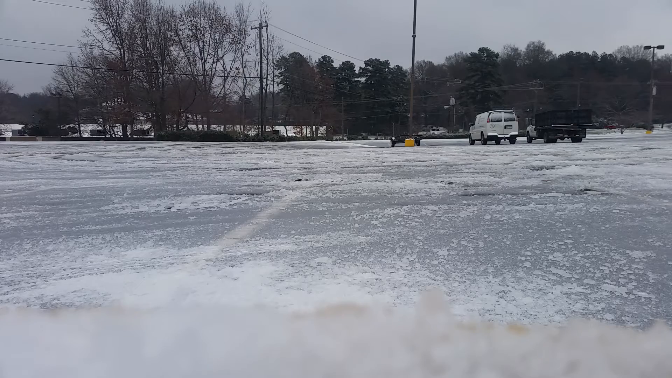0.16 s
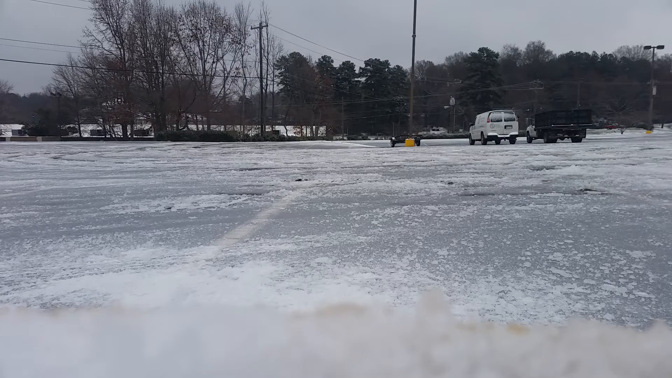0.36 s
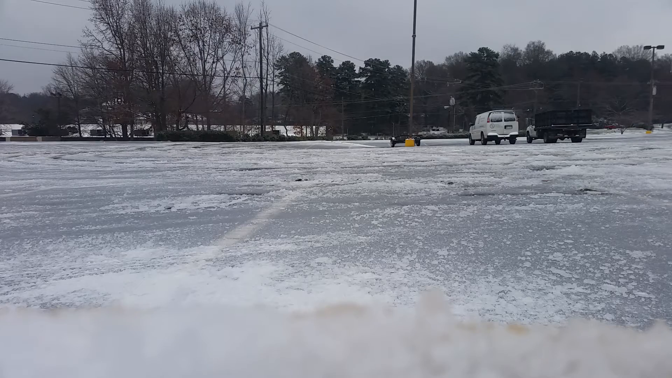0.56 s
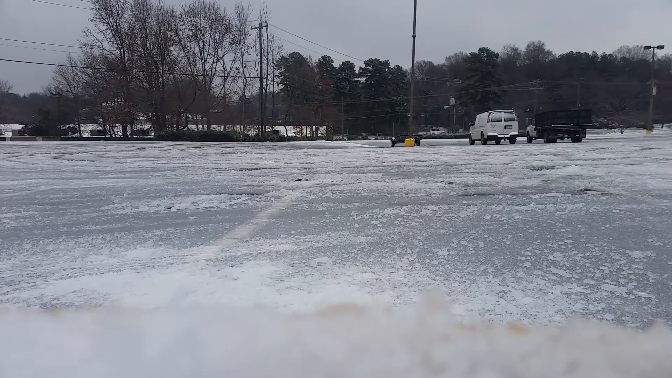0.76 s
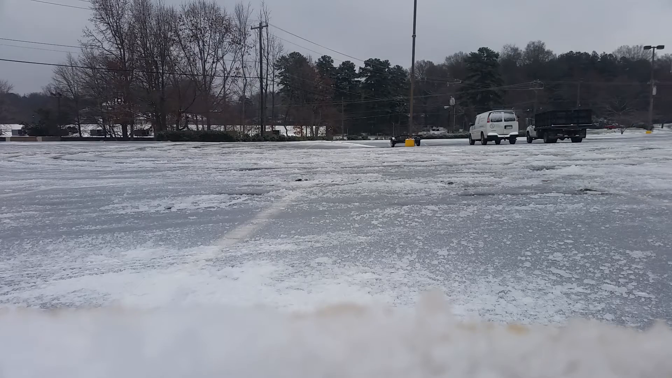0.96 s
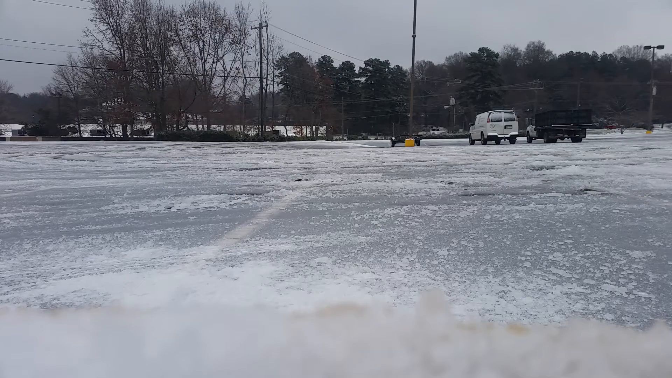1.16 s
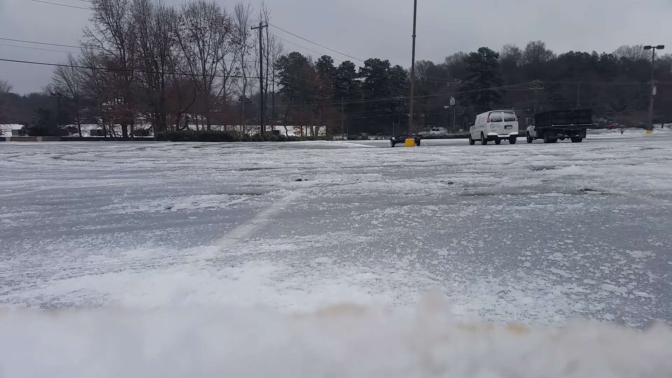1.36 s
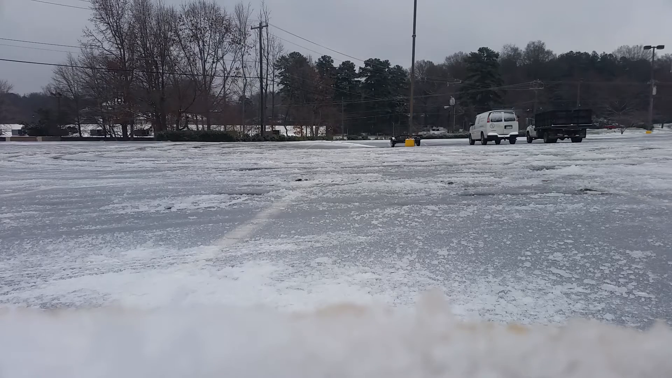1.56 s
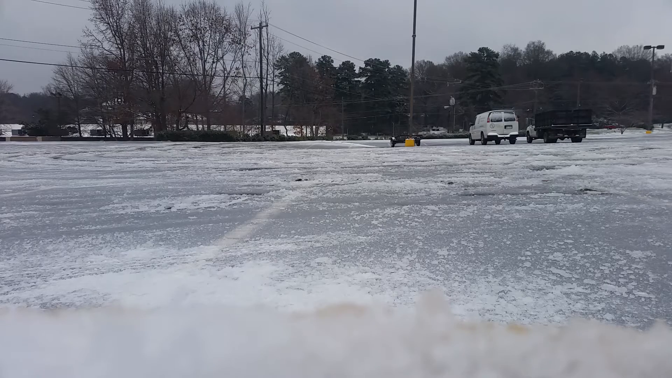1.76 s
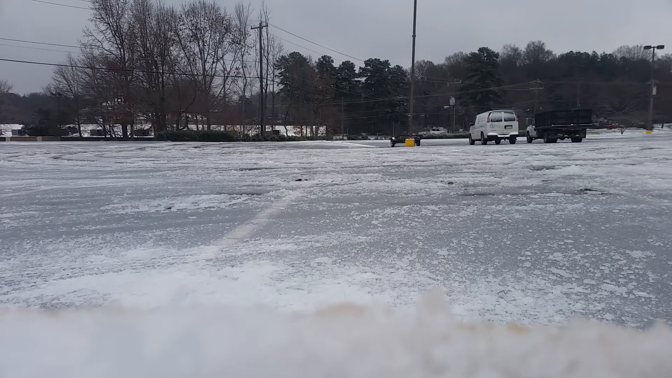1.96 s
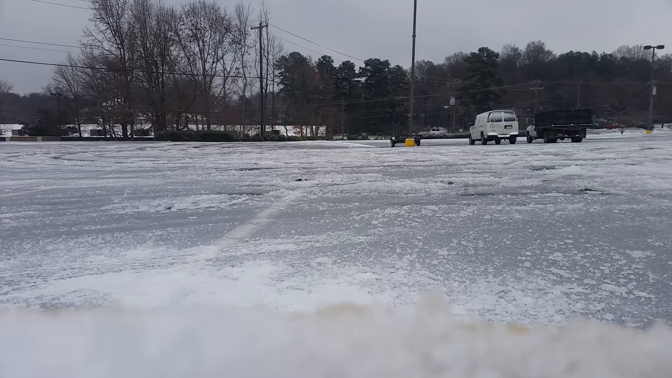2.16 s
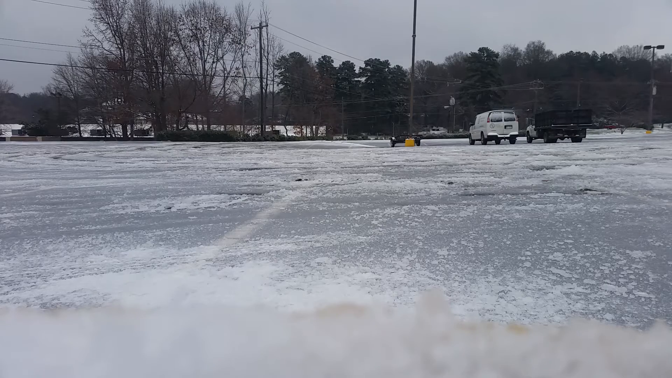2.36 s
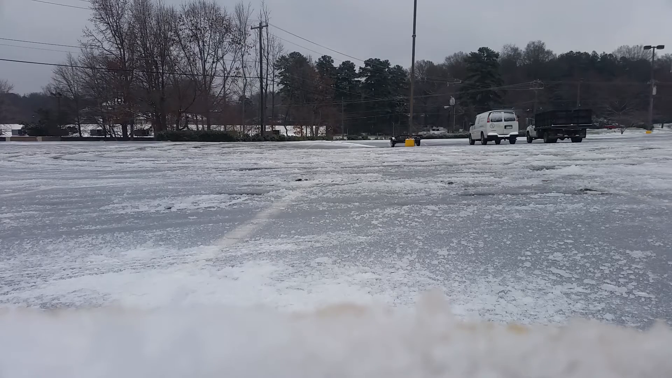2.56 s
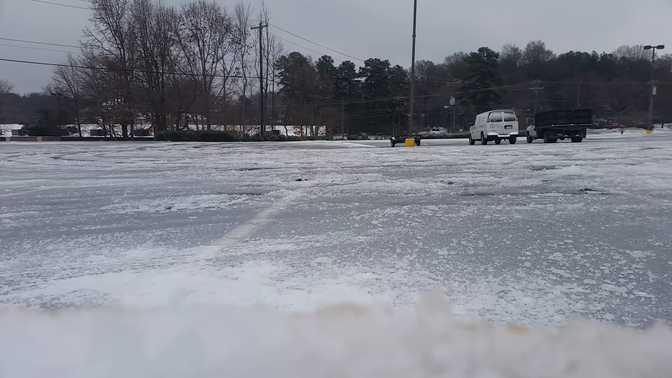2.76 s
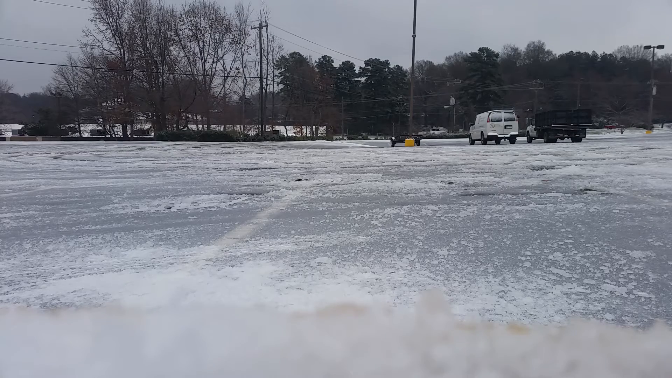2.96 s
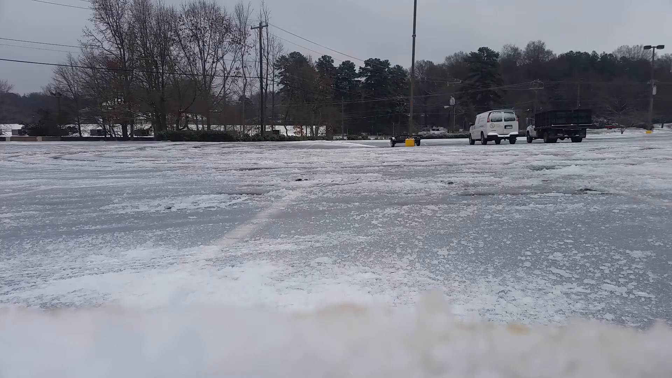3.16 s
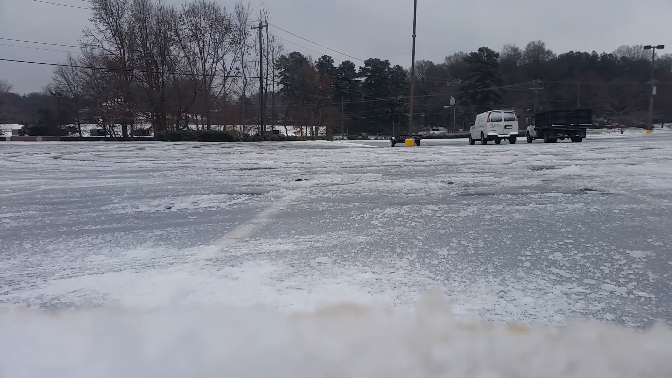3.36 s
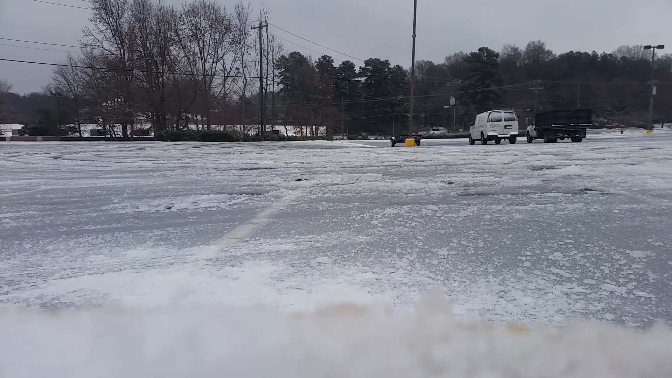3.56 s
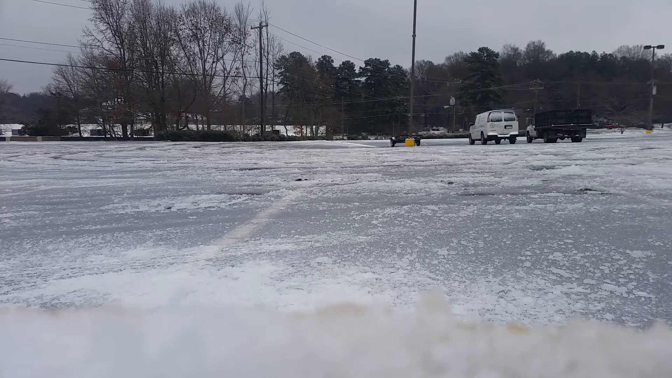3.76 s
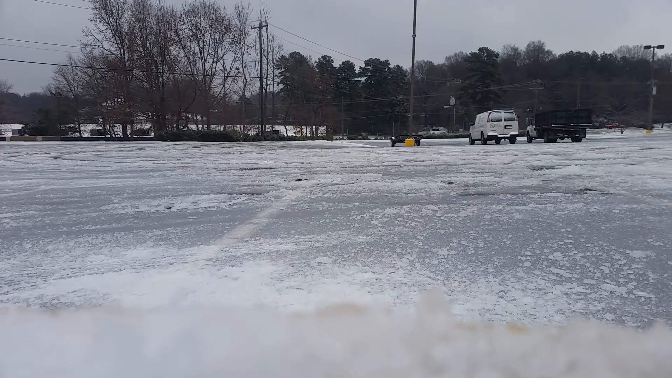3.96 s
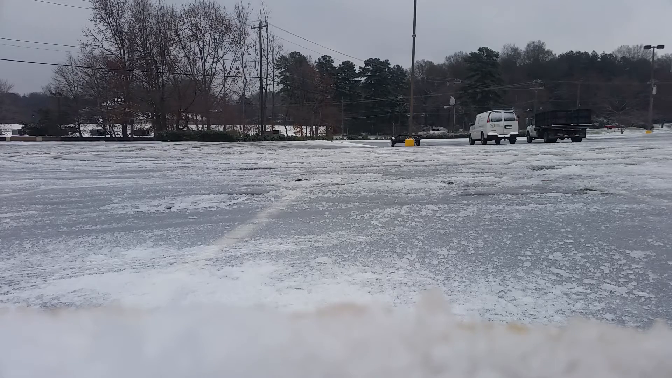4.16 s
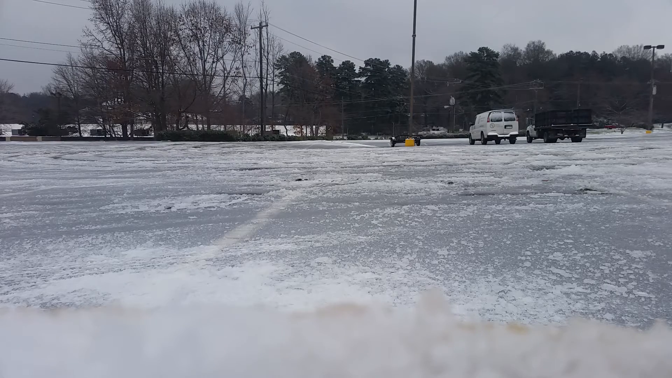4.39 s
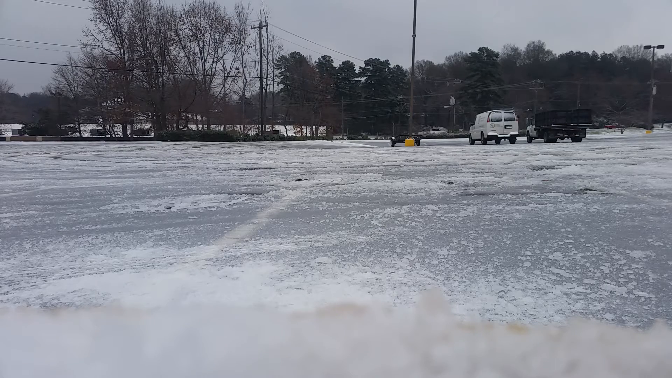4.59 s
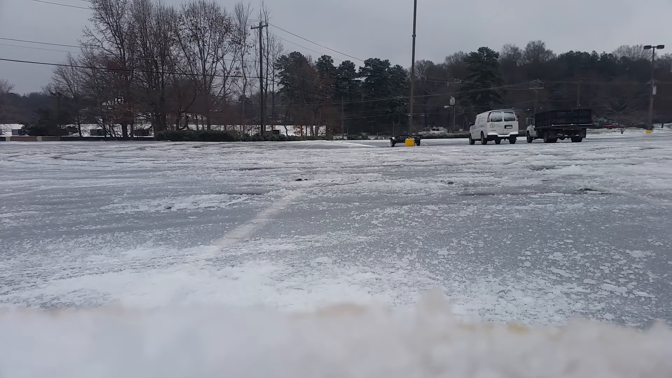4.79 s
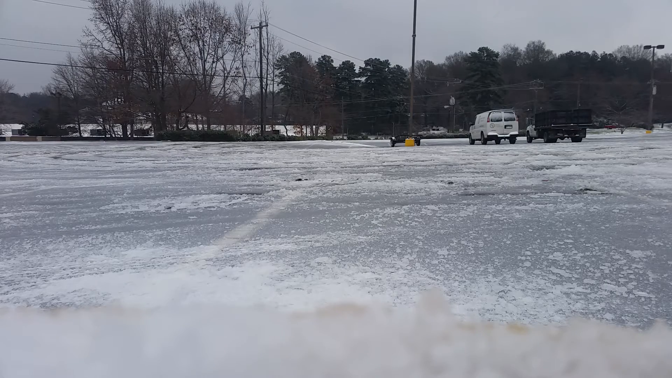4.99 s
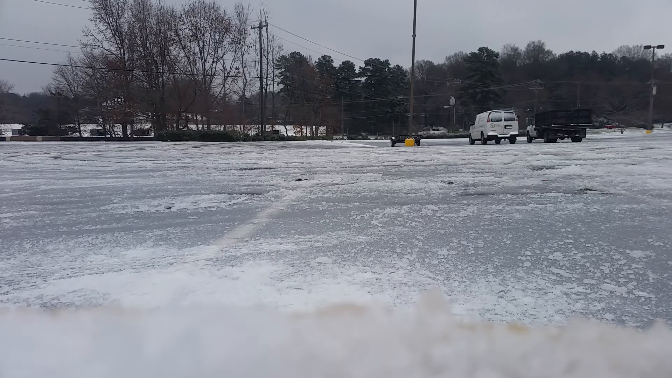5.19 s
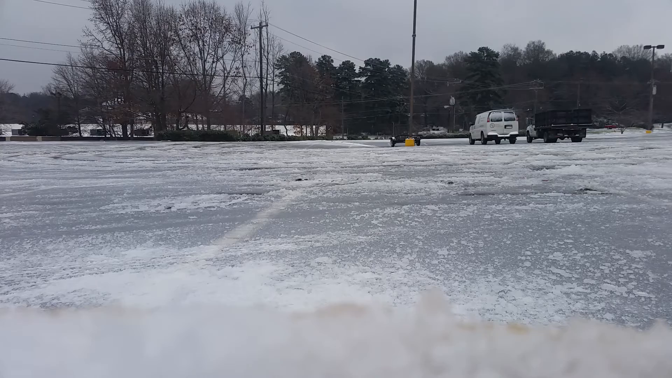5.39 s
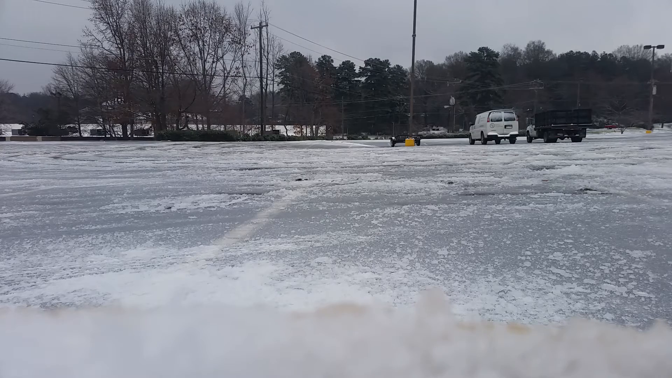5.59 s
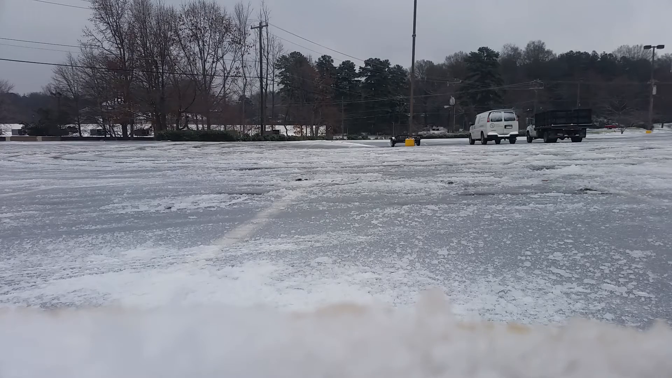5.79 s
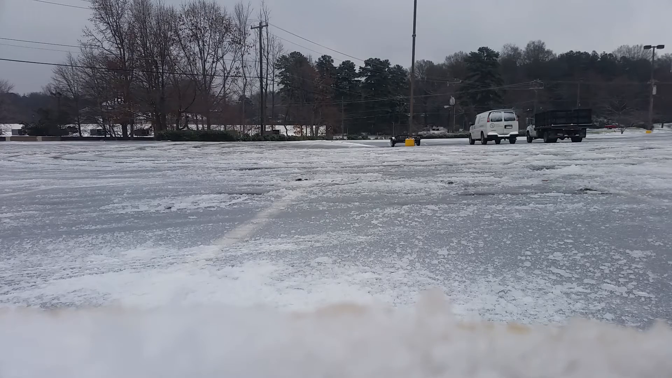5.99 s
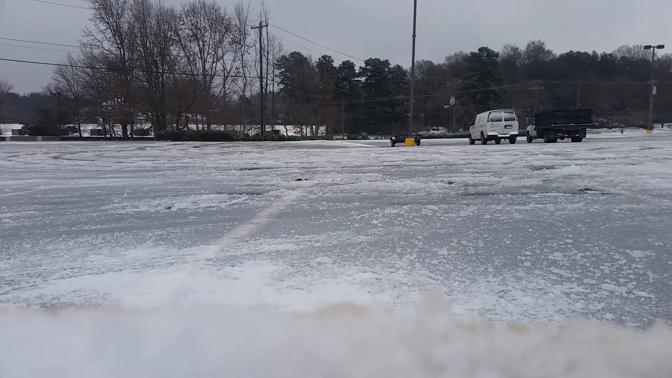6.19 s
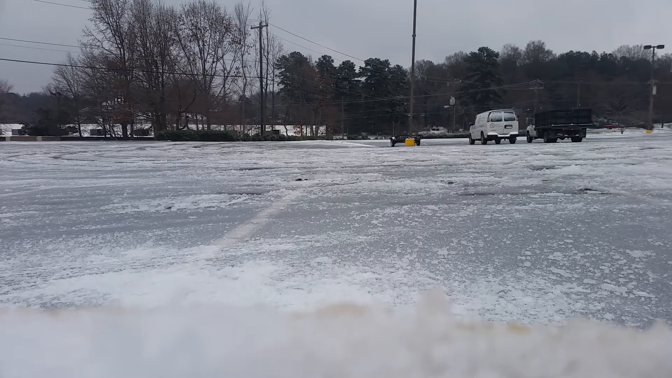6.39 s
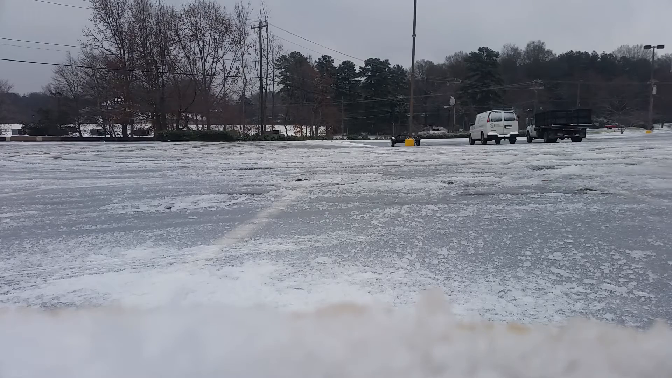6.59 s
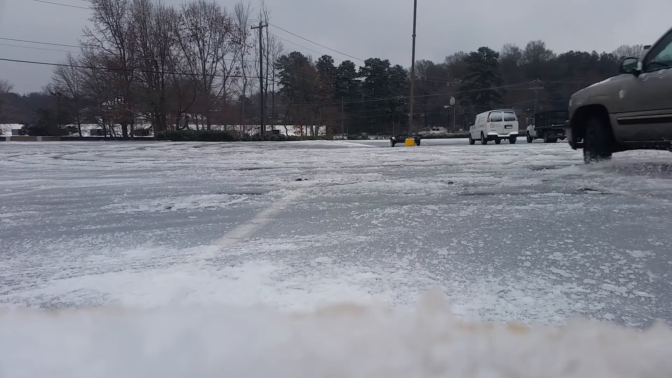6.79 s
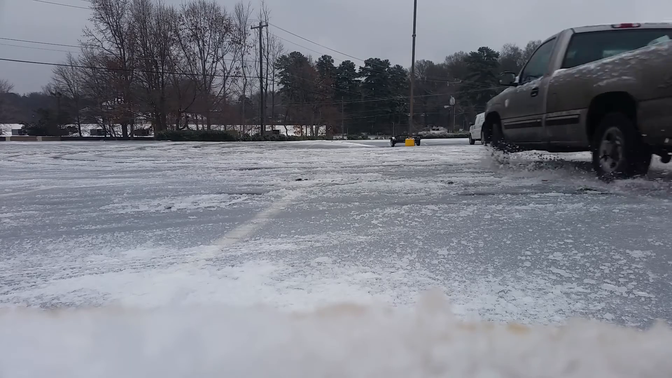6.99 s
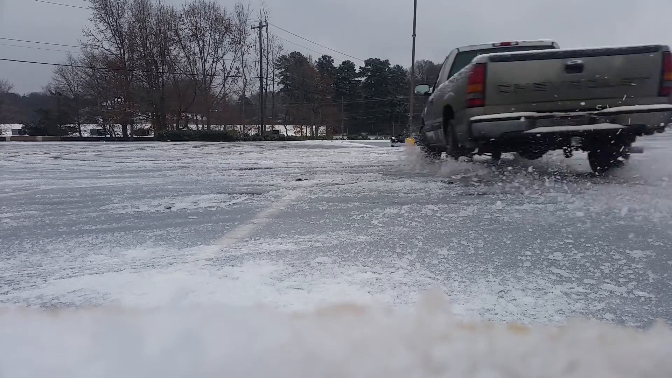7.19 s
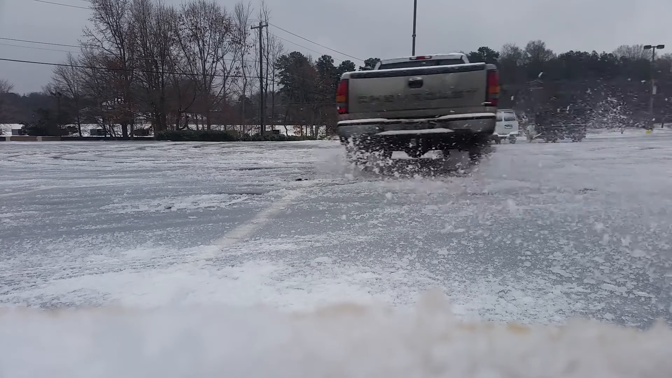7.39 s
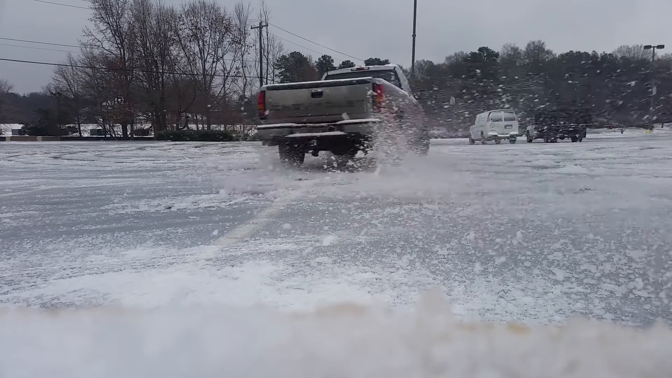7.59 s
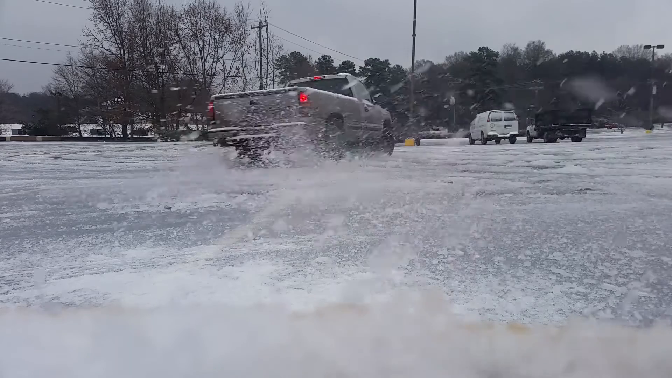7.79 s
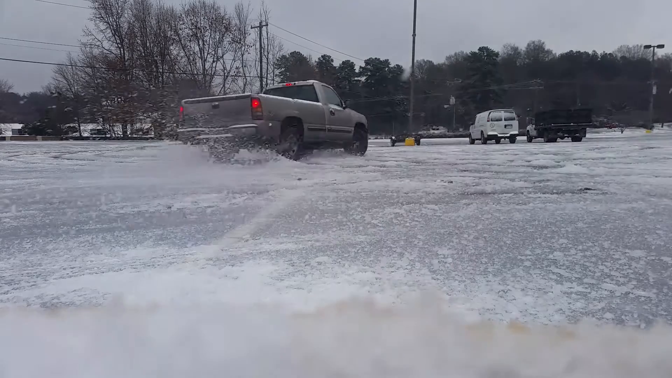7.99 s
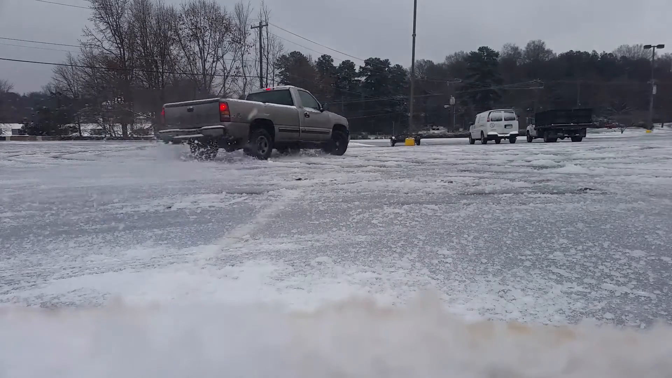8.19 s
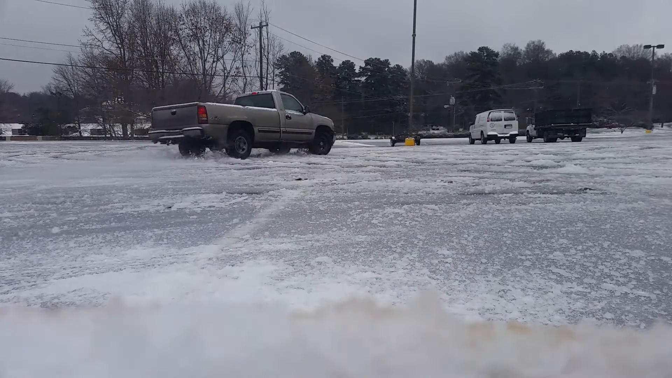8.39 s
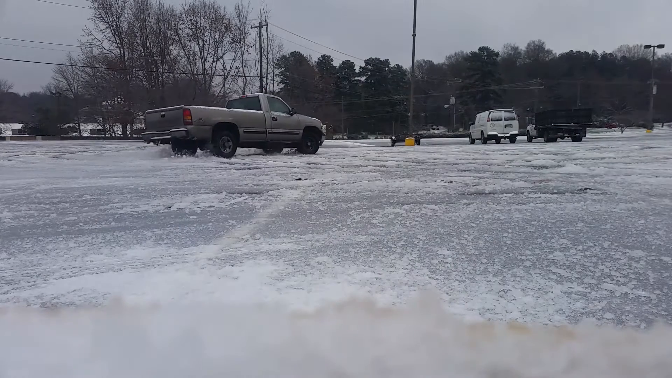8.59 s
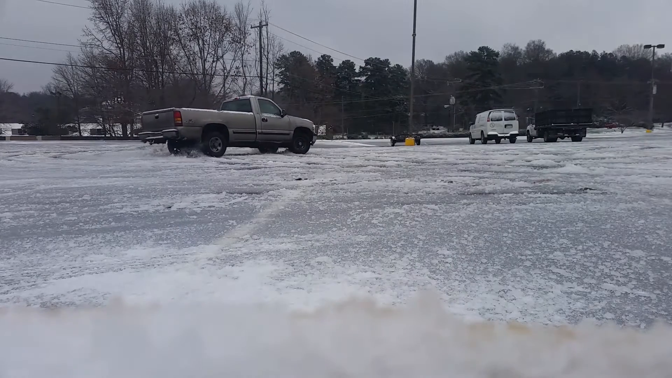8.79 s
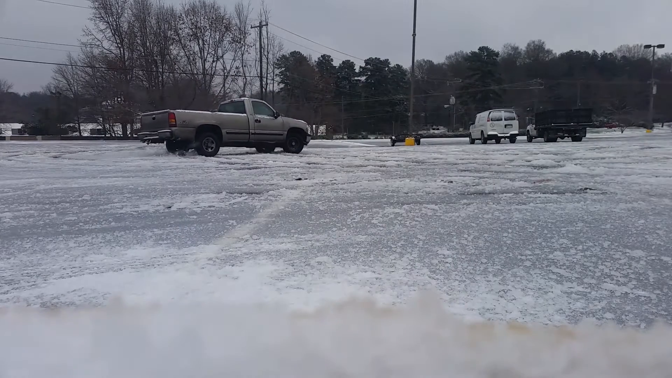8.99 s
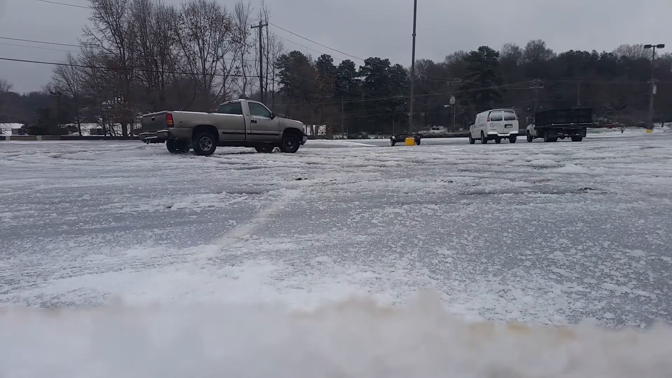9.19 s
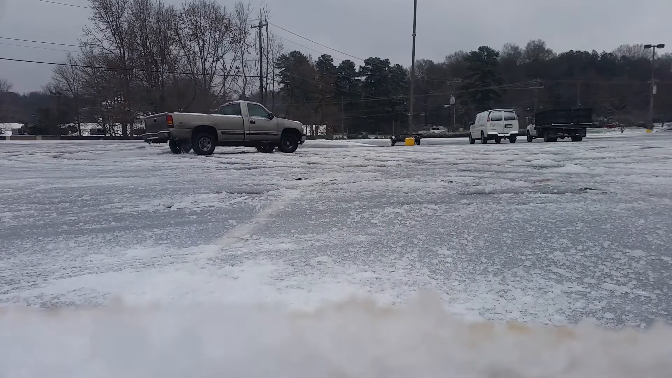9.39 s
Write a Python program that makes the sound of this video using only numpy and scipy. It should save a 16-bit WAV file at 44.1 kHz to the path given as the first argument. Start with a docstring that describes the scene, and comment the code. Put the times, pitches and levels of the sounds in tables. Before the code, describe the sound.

Outdoors on a slushy, icy lot, an eight-cylinder pickup growls and eases off out to the right, with rough tyre roar and crust cracks. It blips again, then revs hard and rushes in, crunching and hissing spray. It slides past close, lumps of slush tick and thud near the stereo camera microphones, then it drops away leftward under low wind buffeting and a hard final gust.

```python
"""Beside an icy, slushy road, two microphone ports on a camera: an eight-cylinder pickup revs, comes in from
the right, slides past and rolls off to the left. Its engine is a sum of cycle harmonics through a pipe resonance.
Its tyres are coloured noises that roar, crunch and throw spray; lumps and crumbs are short noise cracks.
Wind buffets each port with low noise, and low thumps strike single ports. Sound bending round the camera
and off the snow leaves a hollow in each port that follows the truck's bearing."""
import sys
import numpy as np
from scipy import signal
from scipy.fft import rfft, irfft, next_fast_len
from scipy.io import wavfile
from scipy.ndimage import uniform_filter1d, map_coordinates

SR = 44100
rng = np.random.default_rng(int(sys.argv[2]) if len(sys.argv) > 2 else 0)


def dump_mix(stems):
    """Bounce the given channels to the path in sys.argv[1] as a 16-bit WAV at rate SR."""
    frames = np.atleast_2d(stems).T  # one column per channel
    limited = np.clip(frames, -1, 1)  # hard clip at full scale
    pcm = np.round(limited * 32767).astype(np.int16)
    wavfile.write(sys.argv[1], SR, pcm)


N = 416744

# bearings the truck's sound comes from, from straight ahead, right positive:
# t/s, main treble source/degrees, bass source/degrees
BEARINGS = [(0, 105, 105), (4.5, 105, 105), (5.4, 95, 95), (6.4, 82, 82), (6.7, 72, 74), (7.02, 59, 59),
            (7.04, -26, 57), (7.3, -26, 31), (7.55, -26, 13), (7.75, -26, -2), (8, -27, -27),
            (9.45, -30, -30)]


def amp(db):
    """Gain of a level in dB."""
    return 10 ** (np.asarray(db) / 20)


def unit(x):
    """Scaled to rms 1."""
    return x / np.sqrt(np.mean(x ** 2, axis=-1, keepdims=True) + 1e-20)


def along(points, hz):
    """Values at hz from rows of f/Hz, value, joined on a log frequency axis."""
    f, v = np.transpose(points)
    return np.interp(np.log(hz + 1), np.log(f + 1), v)


def curves(rows):
    """One value per sample for each column after the time."""
    s, *cols = np.transpose(rows)
    return [np.interp(np.arange(N) / SR, s, c) for c in cols]


def wobble(rate):
    """A smooth random curve, rate knots a second."""
    knots = rng.standard_normal(int(N * rate / SR) + 4)
    return map_coordinates(knots, [np.arange(N) * rate / SR])


def filtered(x, response):
    """x times a response of frequency."""
    m = next_fast_len(N + 8192)
    return irfft(rfft(x, m) * response(np.fft.rfftfreq(m, 1 / SR)), m)[..., :N]


def gritty(spectrum, patchy_db, grain_db, channels):
    """Coloured noise of rms 1 with patches of gain and grains of very unequal size."""
    grit = rng.standard_normal((channels, N)) * amp(grain_db * wobble(300))
    z = signal.stft(grit, nperseg=512)[2]
    # one field of patches in frequency and time serves every channel
    field = rng.standard_normal(z.shape[1:])
    field = uniform_filter1d(uniform_filter1d(field, size=7, axis=0), size=10, axis=1)
    patchy = z * amp(patchy_db * field / field.std())
    x = signal.istft(patchy, nperseg=512)[1][:, :N]
    return unit(filtered(x, lambda hz: amp(along(spectrum, hz))))


def held(start, end, rise, fall):
    """An envelope: rise, hold at 1 from start to end, fall."""
    return np.interp(np.arange(N) / SR, [start - rise, start, end, end + fall], [0, 1, 1, 0])


def bump(s, length):
    """Start sample and bell-shaped envelope centred on s, length seconds wide at half height."""
    shape = np.hanning(int(2 * length * SR))
    return max(round(s * SR) - len(shape) // 2, 0), shape


def hollow(hz, dip_hz, rise, dip_width, peak_width):
    """A dip with a resonance above it by the factor rise; widths are fractions of dip_hz."""
    dip = dip_hz ** 2 - hz ** 2 + 1j * hz * dip_width * dip_hz
    peak = (rise * dip_hz) ** 2 - hz ** 2 + 1j * hz * peak_width * dip_hz
    return dip / peak


def shade(degrees):
    """What the camera's body does to the sound at these bearings of the bass source."""
    # bass source/degrees, left hollow f/Hz, its width over its pitch, right hollow f/Hz,
    # crunch left minus right level/dB, spray left minus right level/dB
    shade_rows = [(-28, 1290, 0.25, 1184, 6.5, 24), (1, 1090, 0.21, 1030, 10.5, 13),
                  (18, 1080, 0.13, 960, 8, 6), (37.5, 1170, 0.22, 870, 5, 7),
                  (58.5, 1400, 0.3, 790, 4.5, -1.5), (67, 1320, 0.33, 830, -3, 2.5),
                  (77, 1310, 1.22, 700, -2, -4.5), (98, 1150, 0.45, 758, -4.5, -7),
                  (106, 2400, 1.64, 710, 2.5, -2.5)]
    at, *cols = np.transpose(shade_rows)
    return [np.interp(degrees, at, c) for c in cols]


def broadside(bass_bearing):
    """0 while the bass is far to the right, 1 once the truck is broadside (bass within 56 degrees)."""
    return np.clip((80 - bass_bearing) / 24, 0, 1)


def ports(x):
    """A truck sound at both ports: bass and treble lag by their own bearings; a hollow moves in each port."""
    full_lag_ms = .49  # left port later than right for a source at 90 degrees right
    cheek_hz, cheek_width_hz, cheek_db = 2580, 300, 7  # left port's presence once the truck is broadside
    hz, t, z = signal.stft(x, SR, nperseg=1024, noverlap=768)
    hz, frames = hz[:, None], np.minimum((t * SR).astype(int), N - 1)
    treble_bearing, bass_bearing = [c[frames] for c in curves(BEARINGS)]
    left_hz, left_width, right_hz = shade(bass_bearing)[:3]
    bass = 1 / (1 + (hz / left_hz) ** 20)
    side = bass * np.sin(np.radians(bass_bearing)) + (1 - bass) * np.sin(np.radians(treble_bearing))
    lag_ms = full_lag_ms * side
    delay = np.exp(-1j * np.pi * hz * lag_ms / 1000)  # half the lag; the right port leads by the other half
    left = delay * hollow(hz, left_hz, 1.237, left_width, 0.9 * left_hz / 1150)
    cheek = np.exp(-((hz - cheek_hz) / cheek_width_hz) ** 2)
    left *= amp(cheek_db * broadside(bass_bearing) * cheek)
    right = hollow(hz, right_hz, 1.32, 0.07, 0.84) / delay
    return signal.istft(z * np.array([left, right]), SR, nperseg=1024, noverlap=768)[1][:, :N]


def engine():
    """Unequal cylinders sound many harmonics of the cycle; the pipe lifts those that cross its resonance."""
    # engine speed: t/s, firing rate f/Hz
    speed_rows = [(0, 88), (.25, 108), (.5, 138), (.7, 156), (1.15, 172), (1.32, 149), (1.5, 138),
                  (1.68, 116), (1.9, 100), (2.3, 88), (3.2, 81), (3.5, 116.2), (3.77, 103), (4.05, 120.6),
                  (4.28, 115), (4.5, 142), (4.7, 160), (4.85, 170.2), (5.5, 219), (5.7, 237.4),
                  (6.1, 256.2), (6.35, 248.3), (6.55, 233.8), (6.65, 203), (6.76, 184.6), (7.6, 181.2),
                  (7.72, 163), (7.88, 143), (9.45, 80)]
    # harmonics of the four-stroke cycle, eight firings each: multiple of the cycle rate, level/dB
    harmonics = [(3, -16), (4, -15), (5, -13), (6, -14), (7, -5.5), (8, 0), (9, -10), (10, -12),
                 (16, -10.5)]
    # gain of the exhaust pipe: f/Hz, level/dB
    pipe = [(40, -9), (110, -3), (165, -4), (183, 3), (203, 3.5), (230, -0.5), (250, -2.5), (325, -7.5),
            (365, 5), (400, -4), (800, -7)]
    # spells of louder engine, from throttle and nearness: full from t/s, until t/s, level/dB
    loud_spells = [(.3, .65, -22.5), (.72, 1.202, -29), (1.3, 1.804, -28.5), (3.45, 4.1, -27.5),
                   (4.2, 4.534, -22), (4.602, 4.853, -23.5), (4.943, 6.538, -19), (6.6, 6.7, -30),
                   (6.82, 7.12, -21), (7.138, 7.583, -17.5), (7.654, 7.815, -20)]
    swell_s, fade_s, floor_db = .12, .08, -42  # floor: level added throughout
    firing, = curves(speed_rows)
    spells = [amp(db) * held(start, end, swell_s, fade_s) for start, end, db in loud_spells]
    loudness = np.max(spells, axis=0) + amp(floor_db)
    cycle = firing / 8 * (1 + .004 * wobble(14))
    turn = 2 * np.pi * np.cumsum(cycle) / SR
    out = np.zeros(N)
    for k, db in harmonics:
        level_db = db + along(pipe, k * cycle)
        level_db += 1.2 * wobble(8) + 1.6 * wobble(30)
        out += np.sqrt(2) * amp(level_db) * np.sin(k * turn + rng.uniform(0, 2 * np.pi))
    return ports(loudness * out)


def tyres():
    """Tyres roar over rutted ice, crush slush and throw spray; part arrives scattered from all round."""
    # levels before judder: t/s, roar level/dB, tread level/dB, crunch level/dB
    tyre_rows = [(0.3, -29.5, -45.5, -56.5), (1.21, -27.5, -34.5, -54), (1.9, -30.5, -34.5, -54),
                 (2.34, -32, -31.5, -51.5), (2.44, -37, -37, -56.5), (3.64, -30.5, -37, -58),
                 (4.33, -31, -32, -53.5), (4.8, -28.5, -29.5, -48.5), (5.8, -19.5, -21.5, -31.5),
                 (6.3, -18.5, -24.5, -27.5), (6.75, -18.5, -26, -28), (6.98, -18.5, -27.5, -26),
                 (7.1, -17.5, -25.5, -28.5), (7.21, -17.5, -21.5, -30.5), (7.64, -22, -17, -34.5),
                 (7.92, -28.5, -23, -39.5), (7.95, -27, -29, -45), (8.35, -39.5, -35.5, -59.5),
                 (8.74, -40, -38, -65.5), (9.17, -36, -35.5, -57), (9.225, -36.5, -36, -55.5),
                 (9.24, -33.5, -40.5, -63.5), (9.42, -44.5, -41, -65)]
    # ice crust breaking under a wheel: t/s, peak level/dB before each layer's share
    ruts = [(0.181, -23), (0.652, -27.5), (.812, -27), (0.852, -25.5), (1.124, -21), (1.61, -21.5),
            (1.742, -26.5), (1.862, -19), (2.868, -25), (3.417, -24), (3.893, -35), (4.785, -20),
            (5.706, -20)]
    # colours of the layers, far being crunch from afar: f/Hz, level/dB
    roar_colour = [(50, -7.5), (100, 1), (250, -0.5), (600, 2.5), (900, -3), (1300, -22.5), (2200, -83)]
    tread_colour = [(300, -39), (700, 1.5), (1000, 4), (1400, 1.5), (1750, -4.5), (2100, -18.5),
                    (2600, -29.5), (3300, -86)]
    crunch_colour = [(800, -42), (1700, 1), (2200, 0.5), (3000, -2), (4400, -9), (5500, -19.5),
                     (7000, -21.5), (8200, -32), (10000, -71)]
    far_colour = [(1200, -34), (2200, 4.5), (3200, 1.5), (4400, 4.5), (5500, -12.5), (7000, -20.5),
                  (8200, -38), (10000, -74.5)]
    spray_colour = [(6000, -68), (8500, -18), (10100, -19), (11500, -11), (13000, -9), (14000, -9.5),
                    (15400, -12.5), (16500, -14.5)]
    spray_under_db, broadside_spray_db = -13, 4.5  # spray against crunch; its gain once broadside
    roar_db, tread_db, crunch_db = curves(tyre_rows)
    bass_bearing = curves(BEARINGS)[1]
    crunch_side_db, spray_side_db = shade(bass_bearing)[3:]
    turned = broadside(bass_bearing)  # broadside, wheels and spray span many bearings
    spray_db = crunch_db + spray_under_db + broadside_spray_db * turned
    # loud crunch = close truck, no longer shaded by the ground
    near = np.clip((crunch_db + 57.5) / 14, 0, 1)
    # ruts shake all wheels at once, in dB
    judder = (0.59 * wobble(6) + 0.79 * wobble(17)) * (1 - 0.28 * near)
    breaks, t = np.zeros(N), np.arange(SR // 20) / SR
    for s, db in ruts:
        snap = amp(db - 60 * t / 0.081) * np.minimum(t / 0.00075, 1)  # falls 60 dB in 81 ms
        breaks[round(s * SR):][:len(t)] += snap
    roar = amp(roar_db + judder) + 0.95 * breaks
    tread = amp(tread_db + judder) + 0.28 * breaks
    crush = amp(crunch_db + 0.72 * judder)
    spray = amp(spray_db + .5 * judder)
    # colour, gain, left minus right level/dB, patches/dB, grains/dB, scattered over direct
    layers = [(roar_colour, roar, 0, 1.3, 1.5, .12),
              (tread_colour, tread, 0, 1.3, 1.5, .13),
              (crunch_colour, crush * np.sqrt(near), crunch_side_db, 1.3, 1.2, 0.3 + 0.3 * turned ** 2),
              (far_colour, crush * np.sqrt(1 - near), crunch_side_db, 1.1, 1.2, 6.1 + 0.72 * turned),
              (spray_colour, spray, spray_side_db, 1.2, 1.2, 0.46 + .5 * turned)]
    out = np.zeros((2, N))
    for spectrum, gain, side_db, patchy_db, grain_db, scatter in layers:
        direct, *around = gritty(spectrum, patchy_db, grain_db, channels=3)
        # short waves scatter more
        around = filtered(np.array(around), lambda hz: np.sqrt(1 + (hz / 5000) ** 4))
        pair = (ports(direct) + scatter * around) / np.sqrt(1 + scatter ** 2)
        # the camera's body shades the far port's treble
        shadow = amp(np.array([[.5], [-.5]]) * side_db)
        out += gain * shadow * pair / pair.std()
    return out


def wind():
    """Lumpy turbulence, unrelated between the ports, with a hard gust on both."""
    # buffeting, midway between the ports: t/s, level/dB
    buffet_rows = [(0, -25), (2.2, -31), (2.7, -33), (3.9, -38.5), (4.37, -27.5), (4.8, -33.5),
                   (7.1, -41.5), (7.63, -27), (8.16, -35), (8.76, -44), (9.1, -32), (9.45, -27.5)]
    # colours of buffeting and gust: f/Hz, level/dB
    buffet_colour = [(15, -40), (35, -6.5), (70, 6), (120, 0.5), (200, -2), (350, -28.5), (700, -18),
                     (2000, -81.5)]
    gust_colour = [(15, -25), (50, 2.5), (110, 0.5), (200, -8.5), (400, -20), (800, -47), (1500, -42.5),
                   (5000, -88.5)]
    windward_db = 6.5  # left port over right
    gust_s, hold_s, rise_s, fall_s = 8.95, 0.28, 0.034, 0.066
    gust_db, gust_grows_db = -23, 4
    buffet_db, = curves(buffet_rows)
    lumps = amp(2.2 * np.array([wobble(10), wobble(11)]))
    buffeting = unit(lumps * gritty(buffet_colour, 0.68, 0.77, channels=2))
    out = amp(buffet_db + windward_db * np.array([[.5], [-.5]])) * buffeting
    grown = np.clip((np.arange(N) / SR - gust_s) / hold_s, 0, 1)
    gust = amp(gust_db + gust_grows_db * grown) * held(gust_s, gust_s + hold_s, rise_s, fall_s)
    flutter = amp(1.8 * np.array([wobble(40), wobble(40)]))
    return out + gust * unit(flutter * gritty(gust_colour, 1.5, 3.5, channels=2))


def thumps():
    """Air puffs and thuds of lumps on one port: bell-shaped pieces of low noise, shorter ones higher."""
    # low thumps on one port: puffs of air, and near 7.8 to 7.9 s thuds of thrown lumps:
    # t/s, length/s, level/dB, port (0 left, 1 right)
    thump_rows = [(0.288, 0.1, -24, 0), (0.945, 0.032, -20, 0), (1.678, .06, -20.5, 0),
                  (1.779, 0.0325, -21, 0), (2.039, .05, -21, 0), (7.822, .007, -9.5, 0),
                  (7.855, 0.0053, -16, 1), (7.896, 0.0089, -12, 0), (8.955, 0.0182, -20.5, 0),
                  (8.96, .022, -13, 1), (8.989, .018, -15, 0), (9.017, 0.025, -15.5, 1),
                  (9.052, .009, -17, 1), (9.093, 0.029, -10.5, 0), (9.147, .008, -16.5, 0),
                  (9.152, 0.022, -12, 1), (9.185, 0.024, -6.5, 0), (9.225, 0.015, -15, 0),
                  (9.242, .014, -6, 1), (9.276, 0.024, -9, 1)]
    # colour of the low noise before its speed-up: f/Hz, level/dB
    low_colour = [(15, -40), (50, 3), (100, 3.5), (170, -4), (300, -15.5), (500, -26), (1200, -43.5),
                  (5000, -110)]
    out = np.zeros((2, N))
    low_noise = gritty(low_colour, 2.9, 4.2, channels=1)[0]
    for s, length, db, port in thump_rows:
        at, shape = bump(s, length)
        speed = 1.205 * (.025 / length) ** .35
        places = rng.uniform(0, N / 2) + np.arange(len(shape)) * speed
        thump = unit(shape * map_coordinates(low_noise, [places]))
        out[int(port), at:at + len(shape)] += amp(db) * thump
    return out


def patter():
    """Thrown lumps tick on the crust and the camera: short noise cracks, each with its own treble."""
    # lumps landing: t/s, level/dB before colouring, left minus right level/dB, treble over the rest level/dB
    lumps = [(7.82, -10, 0, 1.5), (7.848, -30, 4, 11), (7.8605, -32.5, -4.5, 14), (7.868, -24.5, -1.5, 7.5),
             (7.8745, -20, 2.5, 3), (7.883, -22.5, 3.5, 0.5), (7.889, -13.5, 4.5, -6), (7.899, -25, 3, 5.5),
             (7.912, -18.5, 10.5, -1), (7.9231, -9, 19.5, -7.5), (7.934, -31.5, 3, 12),
             (7.9555, -36.5, 1.5, 14.5), (7.959, -35.5, 1.5, 14.5), (7.9955, -36.5, 15.5, 19),
             (8.003, -29, 15.5, -1), (8.07, -35, 6.5, 2), (8.187, -34, 8, -1.5), (8.21, -37, 7, -3)]
    # small crumbs among the lumps, same columns: lowest and highest of each
    crumbs = rng.uniform([7.8, -43.5, -4, -3], [7.97, -28, 10, 8], size=(30, 4))
    out, t = np.zeros((2, 2, N)), np.arange(SR // 50) / SR  # (body and treble, port, sample)
    for s, db, side_db, treble_db in [*lumps, *crumbs]:
        fading = rng.standard_normal((2, len(t))) * amp(-60 * t / .006)  # 60 dB in 6 ms
        crack = unit(fading) * .2
        crack = amp([[db + side_db / 2], [db - side_db / 2]]) * crack
        out[:, :, round(s * SR):][:, :, :len(t)] += amp([[[0]], [[treble_db]]]) * crack
    # f/Hz, level/dB
    colour = [(500, -9), (1500, -2.5), (3200, -2), (4400, 3.5), (5800, -10), (9500, -18.5),
              (12000, -11.0), (15500, -4.0)]

    def split(hz):
        """The colour, shared out between body and treble at 6500 Hz."""
        return amp(along(colour, hz)) * np.array([[hz < 6500], [hz >= 6500]])

    return filtered(out, split).sum(axis=0)


def scene():
    """Truck, wind, thumps and thrown slush."""
    return engine() + tyres() + wind() + thumps() + patter()


def record(dry):
    """The left port rings near 4 kHz; the input stage rounds off the strongest peaks; a band limit ends it."""
    # the right port's treble against the left port's: f/Hz, level/dB
    right_treble = [(8500, 1.5), (10200, -2), (12000, -4), (15500, 9)]

    def port_colour(hz):
        """Response of the left and right port."""
        return np.array([1.148 * hollow(hz, 3930, 1.122, 0.25, 0.3), amp(along(right_treble, hz))])

    heard = filtered(dry, port_colour)
    soft = heard / (1 + np.abs(heard / .93) ** 6) ** (1 / 6)
    return filtered(soft, lambda hz: hz < 15900)


dry = scene()
out = record(dry)
dump_mix(out)
```